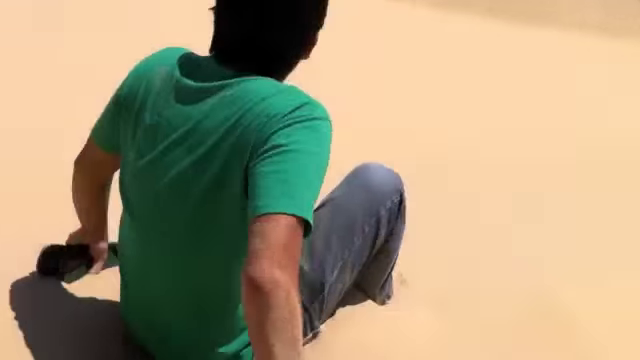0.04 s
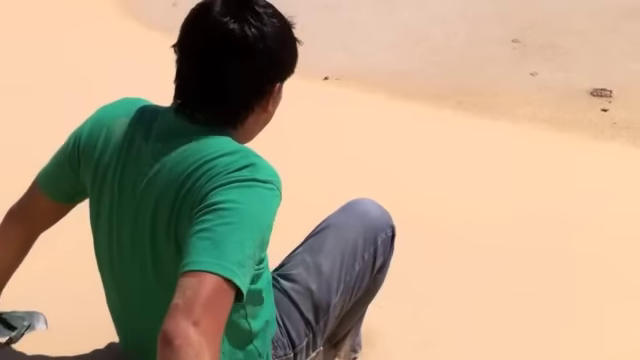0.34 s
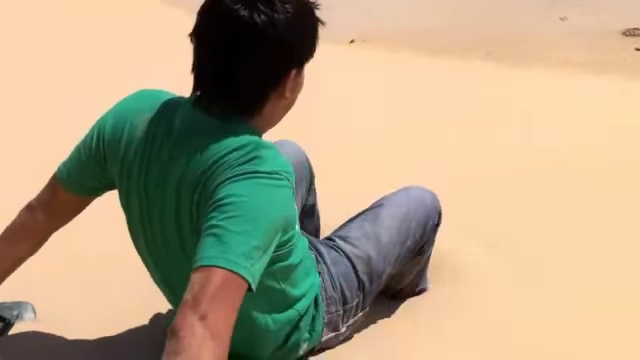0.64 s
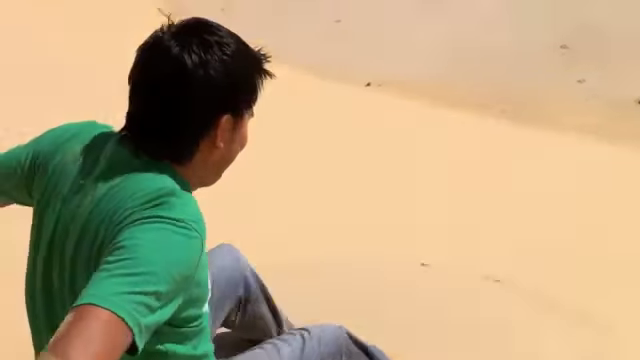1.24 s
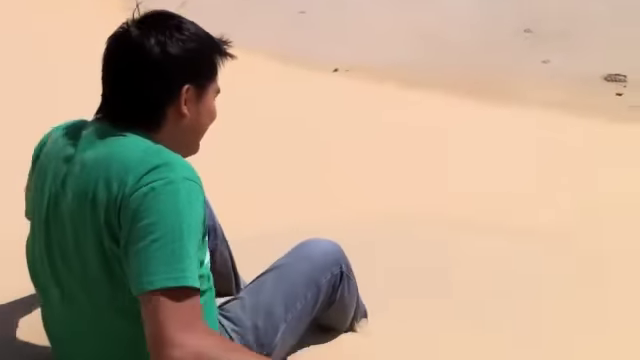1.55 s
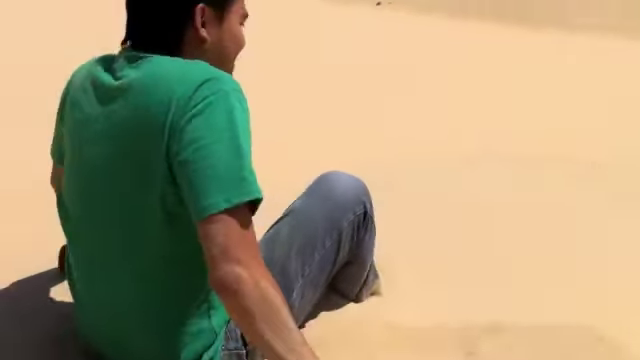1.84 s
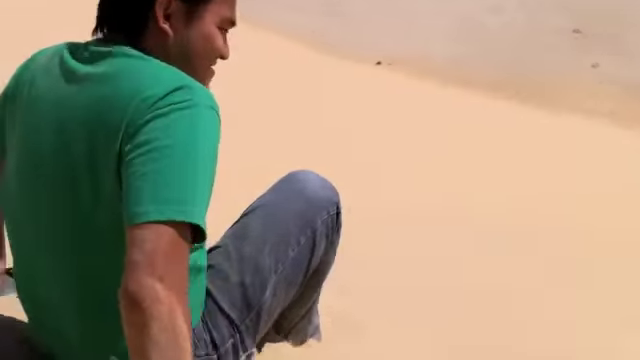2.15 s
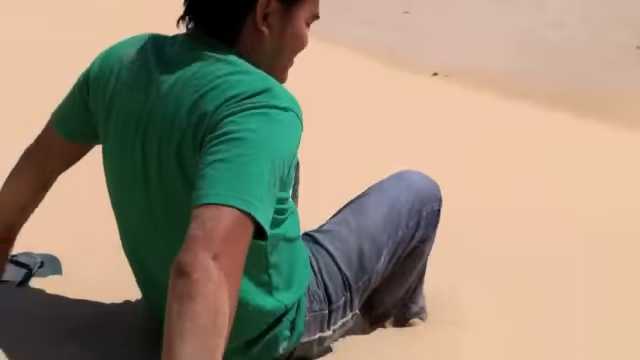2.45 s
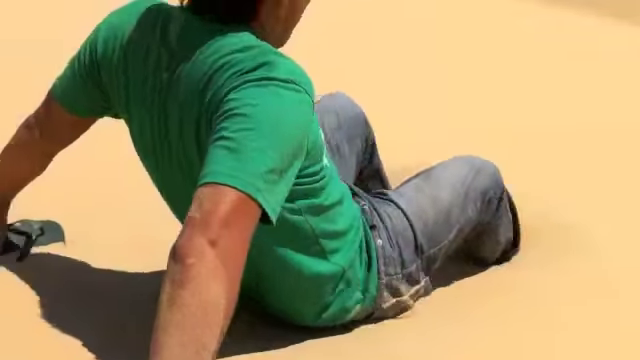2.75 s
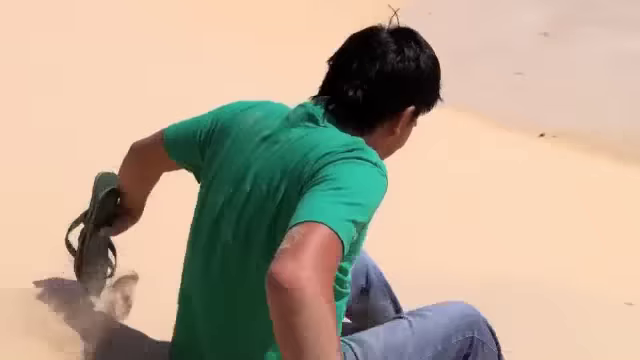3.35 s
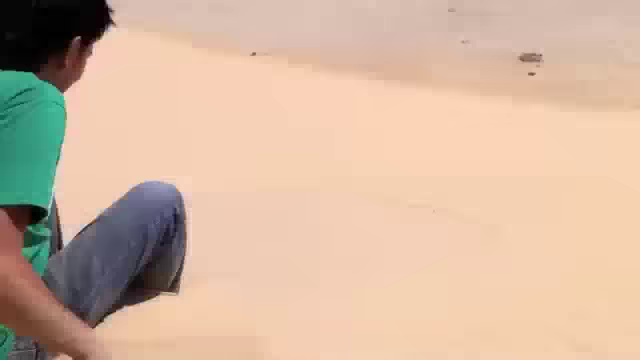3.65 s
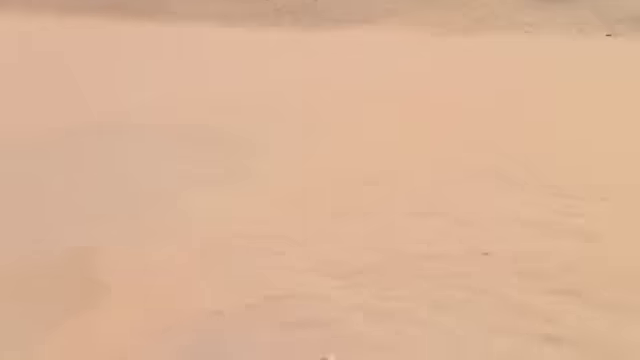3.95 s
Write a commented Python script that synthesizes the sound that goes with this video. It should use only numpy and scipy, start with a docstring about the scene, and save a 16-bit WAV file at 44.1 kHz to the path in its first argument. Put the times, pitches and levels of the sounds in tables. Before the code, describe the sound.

Sliding dune sand booms throughout in a low, wavering drone over a churning rumble as someone pushes himself downhill. Shoves swell it until the microphone overloads in short creaky buzzes. Dull thumps come now and then from 0.5 seconds, clustering just after 3 seconds. Runs of small pops occur near 1.3, 2.4 and 3.2 seconds. Cloth rasp, grain hiss and wind stay faint underneath.

```python
"""Someone shoves himself down a booming dune. From the start the shearing sand drones near 93 Hz,
overtones swelling and beating, over a churning rumble, cloth rasp, faint grain hiss and wind on the
microphone. Shoves swell the boom until the microphone overloads in short creaky buzzes. From 0.5 s heavy
slips thump now and then. Pockets of sand give way in runs of small pops near 1.3, 2.4 and 3.2 s."""
import sys
import numpy as np
from scipy import signal
from scipy.fft import rfft, irfft
from scipy.io import wavfile
from scipy.ndimage import uniform_filter1d, minimum_filter1d

SR = 44100
rng = np.random.default_rng(int(sys.argv[2]) if len(sys.argv) > 2 else 0)


def materialize(psi):
    """Save the field psi as 16-bit PCM at rate SR to the path in sys.argv[1].

    A 1-D psi becomes a single channel; in a 2-D psi each row is a channel.
    """
    bounded = np.clip(np.atleast_2d(psi).T, -1, 1)
    quanta = np.round(bounded * 32767).astype(np.int16)
    wavfile.write(sys.argv[1], SR, quanta)


N = 176400
T = np.arange(N) / SR

# Boom pitch, set by the shear rate. Each row: time in seconds, nominal pitch in Hz.
PITCH_HZ = [(0.0, 90.2), (0.03, 93.1), (0.15, 94.83), (0.41, 92.44), (0.5, 84.85), (0.56, 89.42),
            (0.63, 90.87), (0.7, 96.54), (0.86, 97.37), (1.11, 92.17), (1.19, 94.58), (1.32, 90.2),
            (1.39, 97.67), (1.48, 93.44), (1.57, 97.3), (1.65, 93.72), (1.88, 92.2), (2.0, 92.74),
            (2.17, 87.6), (2.27, 90.36), (2.32, 95.58), (2.46, 99.14), (2.52, 89.36), (2.55, 88.8),
            (2.6, 92.57), (2.76, 90.6), (2.82, 94.99), (3.07, 94.64), (3.11, 91), (3.19, 97.1), (3.56, 92),
            (3.6, 97.9), (3.65, 92.9), (3.75, 91.6), (3.8, 96.7), (3.88, 94.14), (3.93, 97.4), (4.0, 93.9)]
# Partials 1 to 4; the second is the main boom. Each row: time in seconds, relative level in dB.
FIRST_DB = [(0.0, -28), (0.05, -16), (0.58, -19.5), (0.68, -12.5), (0.73, -24.5), (1.09, -14.5),
            (1.47, -22), (2.1, -23), (2.14, -19.5), (2.19, -21), (2.31, -20), (2.33, -32), (2.46, -17.5),
            (3.07, -24.5), (3.1, -13), (3.41, -18.5), (3.48, -26.5), (3.64, -12.5), (3.69, -17.5),
            (4.0, -14)]
SECOND_DB = [(0.0, -38), (0.03, -2), (0.08, -20.5), (0.2, -5), (0.22, -4), (0.24, -30.5), (0.3, -3.5),
             (0.34, -11.5), (0.39, -5.5), (0.49, -18), (0.53, -2.5), (0.56, -18.5), (0.6, -6), (0.7, -25.5),
             (0.77, -6.5), (0.85, -28), (0.89, -6.5), (0.96, -21), (0.98, -11), (1.07, -11), (1.11, -33),
             (1.17, -9.5), (1.27, -15), (1.4, -9.5), (1.43, -19.5), (1.45, -9.5), (1.55, -9.5), (1.57, -20),
             (1.67, -6), (1.97, -12), (1.99, -24.5), (2.04, -17), (2.06, -20), (2.18, -13.5), (2.21, -25.5),
             (2.27, -3.5), (2.32, -32.5), (2.43, -10), (2.52, -31), (2.54, -16), (2.7, -5), (2.73, -27),
             (2.76, -3), (2.8, -25.5), (2.91, -11), (2.93, -20), (3.01, -4), (3.09, -20), (3.15, -10.5),
             (3.21, -14), (3.45, -18), (3.48, -5), (3.56, -19), (3.6, -4.5), (3.68, -29.5), (3.73, -3.5),
             (3.78, -10), (3.93, -6.5), (3.97, -18.5), (4.0, -11.5)]
THIRD_DB = [(0.0, -15.5), (0.1, -9), (0.18, -10), (0.21, -24.5), (0.24, -14), (0.27, -28), (0.31, -15),
            (0.36, -18.5), (0.41, -33.5), (0.44, -24.5), (0.56, -22), (0.59, -27), (0.61, -8.5),
            (0.65, -41), (0.68, -11), (0.81, -18.5), (0.83, -10.5), (0.97, -27.5), (1.08, -20.5),
            (1.12, -4.5), (1.18, -17), (1.27, -15.5), (1.29, -33), (1.39, -13), (1.41, -31.5),
            (1.46, -14.5), (1.53, -10.5), (1.57, -27.5), (1.64, -10.5), (1.83, -9.5), (1.87, -30),
            (1.94, -9), (1.96, -21), (2.02, -12.5), (2.21, -25), (2.28, -18), (2.34, -12.5), (2.37, -42),
            (2.43, -13), (2.48, -36), (2.51, -17), (2.74, -10.5), (2.77, -22.5), (2.91, -13), (2.96, -22),
            (3.15, -25.5), (3.17, -14.5), (3.31, -28), (3.32, -30.5), (3.53, -10.5), (3.63, -21),
            (3.66, -10.5), (3.72, -11.5), (3.75, -19.5), (3.79, -5.5), (3.82, -24.5), (3.9, -8.5),
            (4.0, -17.5)]
FOURTH_DB = [(0.0, -22), (0.09, -15), (0.13, -27), (0.4, -18), (0.48, -31), (0.52, -21.5), (0.6, -43),
             (0.62, -24), (0.79, -16), (0.98, -40), (1.17, -22), (1.3, -35), (1.41, -22.5), (1.76, -26),
             (1.79, -15), (1.93, -28), (1.97, -12.5), (2.03, -27.5), (2.14, -18), (2.22, -31), (2.25, -20),
             (2.31, -46.5), (2.58, -22.5), (2.86, -25), (2.94, -19.5), (3.05, -31), (3.1, -22.5),
             (3.38, -30), (3.42, -20), (3.82, -27), (3.84, -20.5), (4.0, -21)]
# Higher partials. Each row: multiple of the pitch, level in dB against FOURTH_DB.
UPPER_PARTIALS = [(5, -11), (6, -16.5), (7, -21), (8, -30.5), (9, -30)]
# Noise spectra. Each row: frequency in Hz, relative density in dB.
CHURN_SPECTRUM = [(20, -48), (50, -36), (75, -3), (120, -10), (160, 10), (230, 6), (330, 1.5), (480, -7.5),
                  (700, -14.5), (1000, -26), (1500, -43), (3000, -65), (16000, -91.5)]
RASP_SPECTRUM = [(200, -5), (700, -0.5), (1000, 1.5), (1500, -5), (2200, -11), (3200, -20.5), (5000, -32.5),
                 (16000, -59.5)]
HISS_SPECTRUM = [(100, -3.5), (2000, -5.5), (4000, 3), (5200, 2), (8000, 2.5), (10700, 0), (12300, 4.5),
                 (14000, 0.5), (16000, 4)]
WIND_SPECTRUM = [(5, 5.5), (25, -3), (50, -8.5), (100, -19.5), (300, -48.5), (2000, -89.5)]
# Noise envelopes. Each row: time in seconds, relative level in dB.
CHURN_DB = [(0.0, -20), (0.08, -29), (0.13, -44), (0.22, -21.5), (0.29, -28.5), (0.53, -17.5),
            (0.58, -22.5), (0.89, -20.5), (0.93, -23), (1.38, -19), (1.41, -19), (1.57, -20.5), (1.66, -18),
            (1.69, -25.5), (1.75, -22.5), (1.88, -23), (2.44, -20), (2.6, -20), (2.74, -18), (2.76, -22),
            (3.06, -21.5), (3.1, -27), (3.26, -21), (3.31, -20.5), (4.0, -25)]
RASP_DB = [(0.0, -40.5), (0.2, -46), (0.73, -48), (0.83, -49), (1.09, -50.5), (1.63, -46), (2.36, -49),
           (2.64, -44), (2.73, -48.5), (3.48, -49.5), (3.72, -48), (4.0, -48.5)]
HISS_DB = [(0, -49), (.3, -51), (.7, -51), (1.2, -50), (1.8, -49.5), (2.18, -50.5), (2.23, -51.5),
           (3.1, -51), (3.4, -49), (3.62, -51), (3.8, -52.5), (4, -51.5)]
# Flung sand. Each row: peak time and half length in seconds, centre and width in Hz, level in dB.
SPRAYS = [(3.1805, .001, 3500, 3400, -28), (.812, 0.0086, 2800, 3500, -44),
          (1.874, 0.0026, 10900, 3200, -39.5), (2.13, .08, 14100, 4000, -61),
          (3.407, 0.0021, 4900, 2250, -37), (3.32, 0.091, 7200, 4987, -68)]
# Shoves. Each row: peak time in seconds, half length in seconds, gain in dB.
SHOVES = [(0.027, 0.023, 2), (.108, .011, 4.5), (0.179, 0.029, 3.8), (0.767, 0.017, 2), (1.173, .01, 1.9),
          (1.456, .011, 3.5), (1.487, 0.0078, 2.5), (1.679, 0.025, 2), (1.771, 0.036, 3.5),
          (1.9, 0.0097, 3), (2.271, .016, 2), (2.673, .04, 2.5), (3.484, 0.0098, 1.2), (3.524, 0.0056, 3),
          (3.601, 0.0092, 2.5), (3.744, .026, 4.5), (3.885, 0.043, 1.5)]
# Heavy slips. Each row: start in seconds, level in dB, final pitch in Hz.
THUMPS = [(0.5131, 1.9, 170), (0.5254, -1.5, 170), (1.1313, -1, 180), (2.2557, 1.5, 164.9),
          (2.2845, -2, 165), (2.4245, -2, 190.2), (2.726, 1, 169), (3.0943, 4.5, 175.7), (3.1221, 2, 149.5),
          (3.1369, 1.5, 160), (3.1646, 0, 170.9), (3.179, 2.5, 196), (3.2373, 2, 141), (3.782, 2, 170)]
# Collapsing pockets. Each row: peak time in seconds, level in dB, pitch in Hz.
POPS = [(1.222, -15.5, 655), (1.260, -5, 464), (1.275, -23, 480), (1.302, -15, 625), (1.331, -15.5, 625.6),
        (1.373, -12.5, 760), (1.404, -10, 526.3), (1.417, -1, 467.2), (2.300, -12, 559.8),
        (2.345, -11, 484), (2.378, -13, 570), (2.442, -12, 620.6), (3.139, -18, 601.4), (3.195, -8, 516),
        (3.224, -6, 480), (3.402, -19, 696)]


def amp(db):
    """Decibels to gain."""
    return 10 ** (np.asarray(db) / 20)


def unit_rms(x):
    """Scales to rms 1."""
    return x / np.sqrt(np.mean(x ** 2) + 1e-20)


def curve(rows):
    """Joins (seconds, value) rows by straight lines."""
    return np.interp(T, *np.transpose(rows))


def coloured(x, spectrum):
    """Filters x by (Hz, dB) rows; rms 1."""
    hz, db = np.transpose(spectrum)
    bins_hz = np.fft.rfftfreq(N, 1 / SR)
    gain = amp(np.interp(np.log(bins_hz + 1), np.log(hz + 1), db))
    return unit_rms(irfft(rfft(x) * gain, N))


def waver(rate_hz):
    """Smooth noise up to about rate_hz; rms 1."""
    bins_hz = np.fft.rfftfreq(N, 1 / SR)
    return unit_rms(irfft(rfft(rng.standard_normal(N)) * np.exp(-(bins_hz / rate_hz) ** 2), N))


def slip_phase():
    """One turn per slip of the sheared layer."""
    return 2 * np.pi * np.cumsum(curve(PITCH_HZ) * 0.997) / SR


def shove_db():
    """Extra level while a shove drives the sand harder."""
    return sum(db * np.exp(-((T - peak_s) / half_s) ** 4) for peak_s, half_s, db in SHOVES)


def partial(phase, level_db, drift, tremble_depth, tremble_hz):
    """One partial: drifts and trembles, falls more into step under a shove."""
    angle = phase + drift * waver(rate_hz=9.9) / (0.5 + 0.17 * np.abs(shove_db()))
    tremble = tremble_depth * (waver(tremble_hz) + 1j * waver(tremble_hz))
    swell = uniform_filter1d(amp(level_db), round(0.012 * SR))
    return np.sqrt(2) * swell * ((1 + tremble) * np.exp(1j * angle)).imag


def boom():
    """The sheared layer vibrates as one; each partial swells on its own."""
    phase = slip_phase()
    out = amp(-3) * partial(1.02 * phase, curve(FIRST_DB), drift=0.69, tremble_depth=0.31, tremble_hz=16)
    out += amp(1.66) * partial(2 * phase, curve(SECOND_DB), drift=0.4, tremble_depth=0.079, tremble_hz=51)
    out += amp(0.76) * partial(3 * phase, curve(THIRD_DB), drift=0.3, tremble_depth=0.079, tremble_hz=22)
    out += amp(-1.1) * partial(4 * phase, curve(FOURTH_DB), drift=0.6, tremble_depth=0.1, tremble_hz=21.9)
    for multiple, db in UPPER_PARTIALS:
        level_db = curve(FOURTH_DB) + db + 3 * waver(rate_hz=1.2)
        out += partial(multiple * phase, level_db, drift=0.95, tremble_depth=0.3, tremble_hz=24.5)
    return out


def churn(slips_per_s=700):
    """Countless small slips blend into a lumpy rumble."""
    slips = rng.choice([-1, 1], N) * (rng.random(N) < slips_per_s / SR)
    drive = unit_rms(slips) + 0.62 * rng.standard_normal(N)
    return coloured(drive, CHURN_SPECTRUM) * amp(curve(CHURN_DB) + 5 + 2.6 * waver(rate_hz=19))


def swing_limit(x, max_swing=1.02, window_samples=400):
    """Loose sand swings only so far: the widest swells level off smoothly."""
    peaks = -minimum_filter1d(-np.abs(x), window_samples)
    reach = uniform_filter1d(peaks, window_samples)
    return x / (1 + (reach / max_swing) ** 10) ** (1 / 10)


def rasp():
    """Cloth drags over the grains, pulsing at the boom's pitch."""
    friction = (1 + 0.5 * np.cos(slip_phase())) * rng.standard_normal(N)
    return coloured(friction, RASP_SPECTRUM) * amp(curve(RASP_DB) + 6 + 2 * waver(rate_hz=40))


def grains():
    """Loose sand hisses; flung sand adds ticks and short sprays."""
    out = coloured(rng.standard_normal(N), HISS_SPECTRUM)
    out *= amp(curve(HISS_DB) + 1.5 + 0.36 * waver(rate_hz=25))
    for peak_s, half_s, centre_hz, width_hz, db in SPRAYS:
        band = unit_rms(waver(width_hz / 2) * np.cos(2 * np.pi * centre_hz * T))
        out += amp(db) * band * np.exp(-((T - peak_s) / half_s) ** 2)
    return out


def wind():
    """Soft, uneven buffeting of the microphone."""
    return coloured(rng.standard_normal(N), WIND_SPECTRUM) * amp(-54.5 + 3.6 * waver(rate_hz=6))


def overload_buzz(drone):
    """Shoves swell the drone; a dry buzz pulses once per cycle during the loud swells."""
    gain = amp(shove_db())
    buzz = coloured(rng.standard_normal(N), [(900, -3), (6000, -9), (16000, -30.5)]) * amp(-32)
    pulses = np.cos(slip_phase() / 2) ** 8
    return drone * gain + buzz * (gain - 1) * pulses


def thumps(drone, rise_s=0.0018, bend=1.52, duck_depth=0.41, duck_s=0.0049):
    """A heavy slip briefly ducks the drone and knocks once, pitch dropping fast."""
    out = drone.copy()
    for start_s, db, final_hz in THUMPS:
        age = np.maximum(T - start_s, 0) / rise_s
        turns = final_hz * rise_s * (age + bend * (1 - np.exp(-age)))
        envelope = (age * np.exp(1 - age)) ** 1.3
        out *= 1 - duck_depth * np.exp(-((T - start_s - rise_s) / duck_s) ** 2)
        out -= amp(db) * envelope * np.sin(2 * np.pi * turns)
    return out


def pops(decay_s=0.0012, rounding_s=0.00007):
    """Each collapsing pocket gives a rounded push of one or two cycles."""
    out = np.zeros(N)
    for peak_s, db, hz in POPS:
        offset_s = T - peak_s
        envelope = np.exp((rounding_s - np.hypot(offset_s, rounding_s)) / decay_s)
        out += amp(db) * envelope * np.cos(2 * np.pi * hz * offset_s)
    return out


def scene(low_cut_hz=71):
    """All sources at one microphone; churn and pops carry no deep bass."""
    low_cut = signal.butter(4, low_cut_hz, "highpass", fs=SR, output="sos")
    drone = swing_limit(boom() + signal.sosfiltfilt(low_cut, churn() + pops()))
    return (thumps(overload_buzz(drone)) + rasp() + grains() + wind())[None]


def record(dry, ceiling=0.915, hardness=70, cutoff_hz=15750):
    """Overload flattens the loudest swells; a low-pass follows."""
    clipped = dry / (1 + np.abs(dry / ceiling) ** hardness) ** (1 / hardness)
    low_pass = signal.firwin(511, cutoff_hz, window=("kaiser", 9), fs=SR)
    return signal.oaconvolve(clipped, low_pass[None], "same")


dry = scene()
out = record(dry)
materialize(out)
```